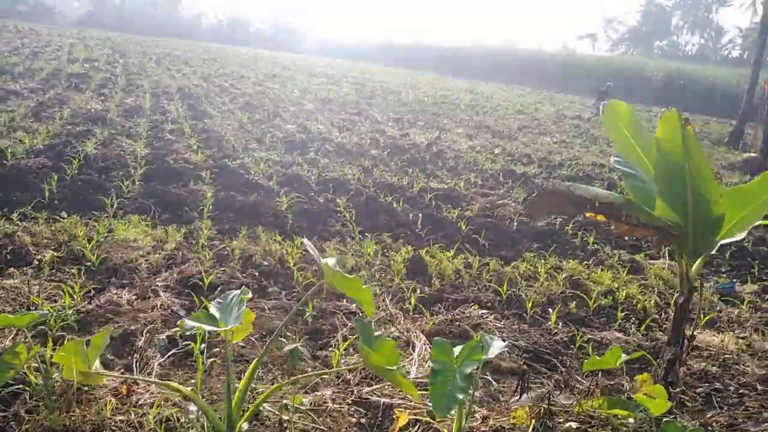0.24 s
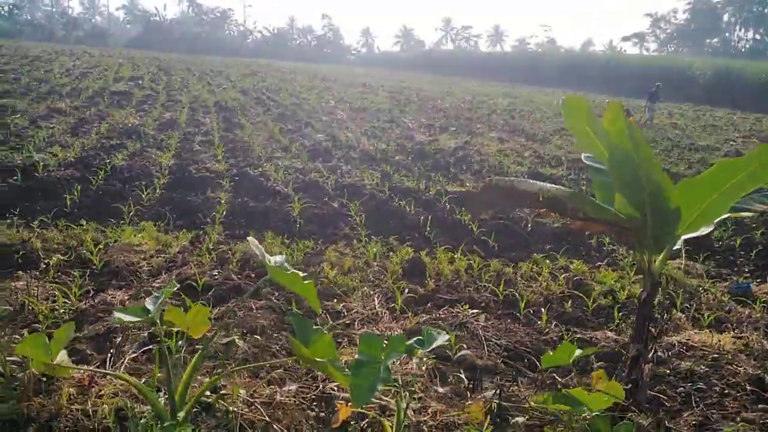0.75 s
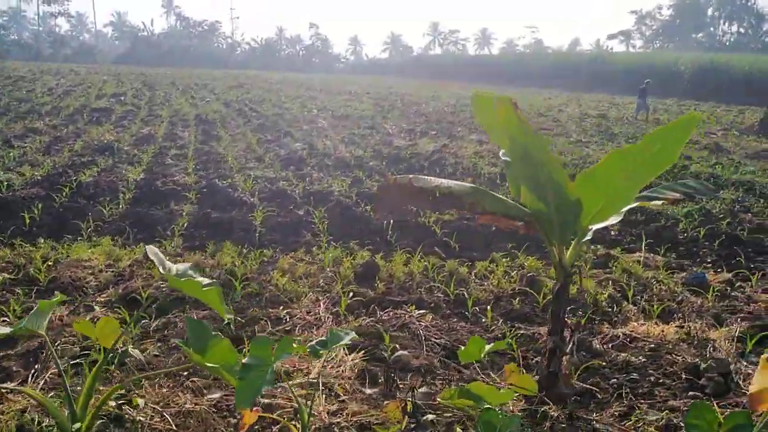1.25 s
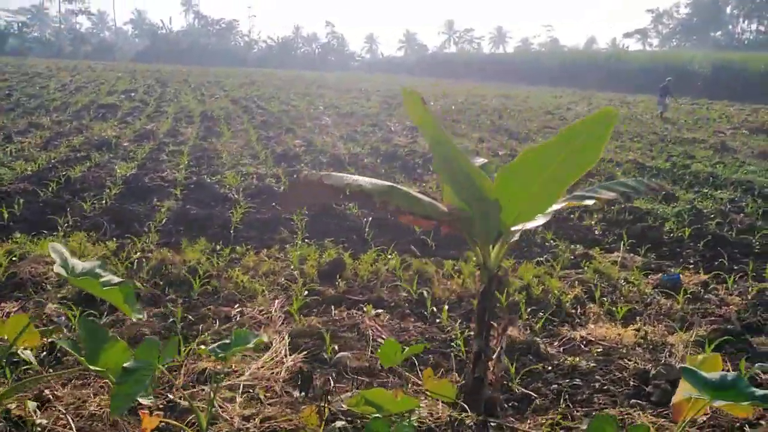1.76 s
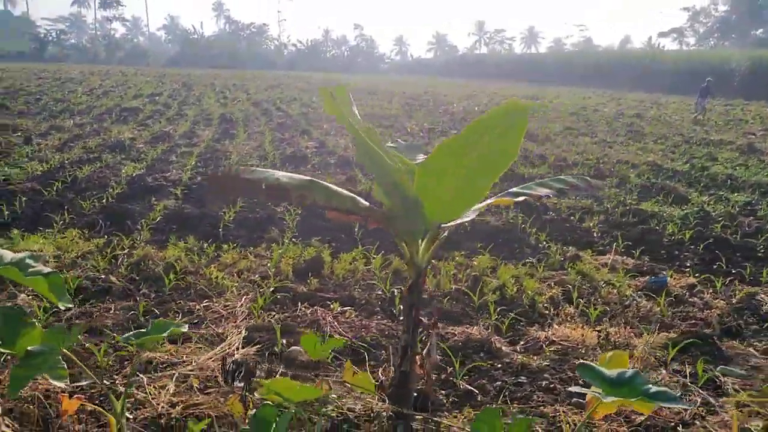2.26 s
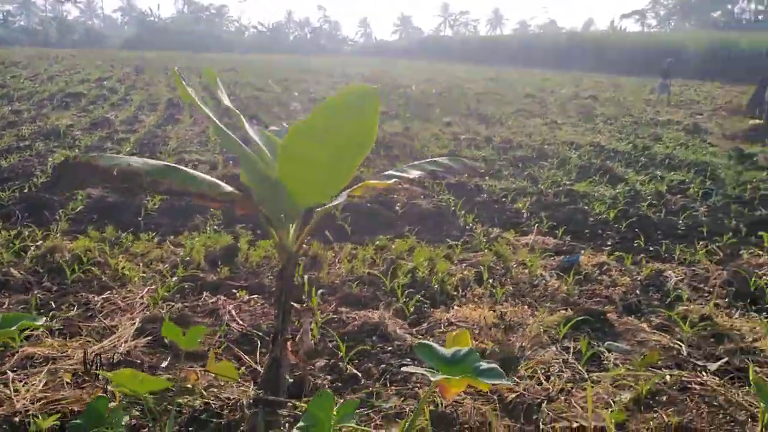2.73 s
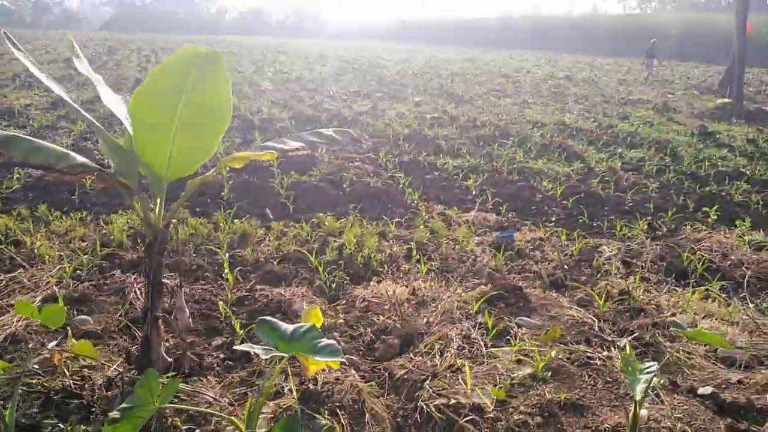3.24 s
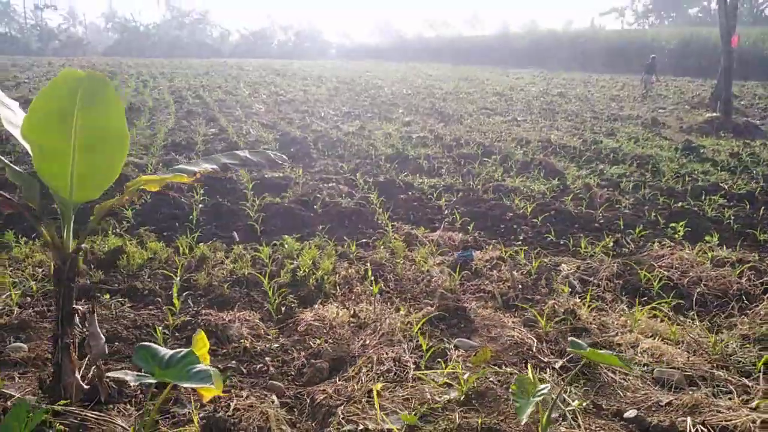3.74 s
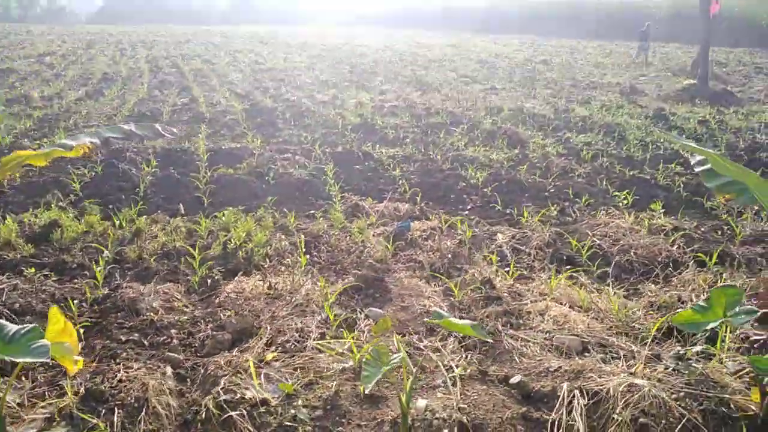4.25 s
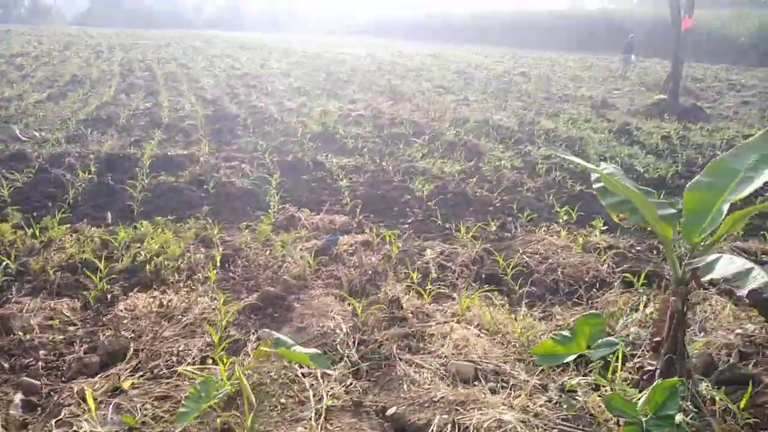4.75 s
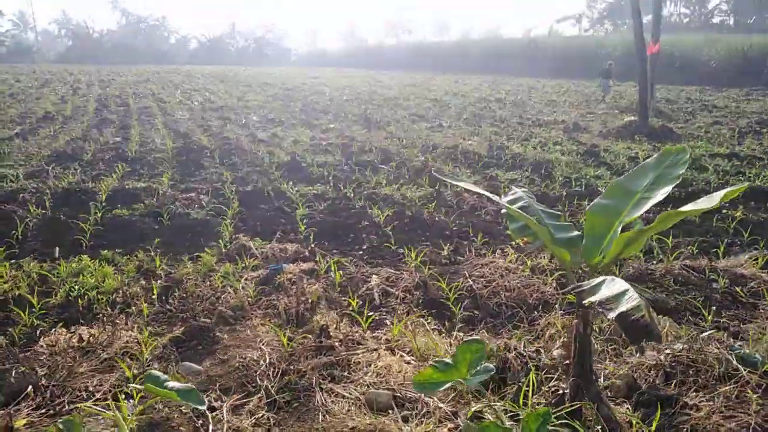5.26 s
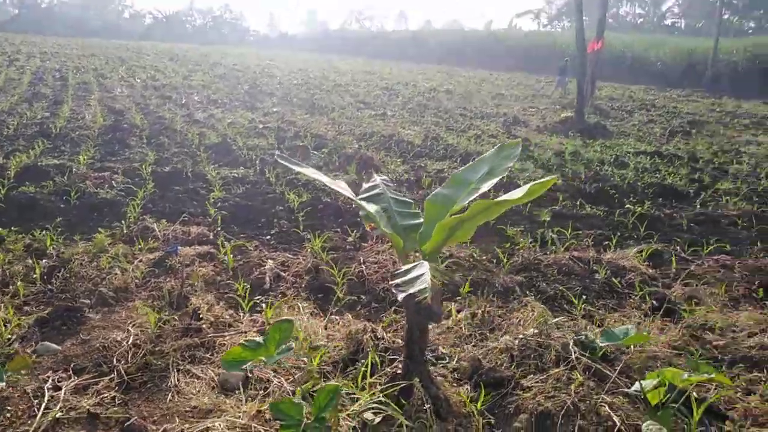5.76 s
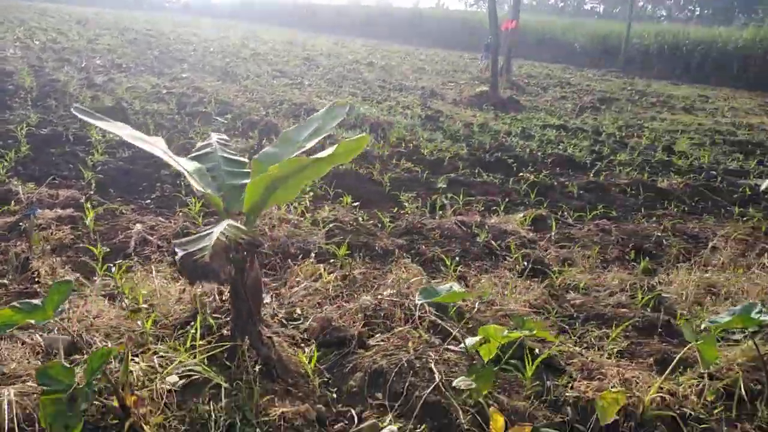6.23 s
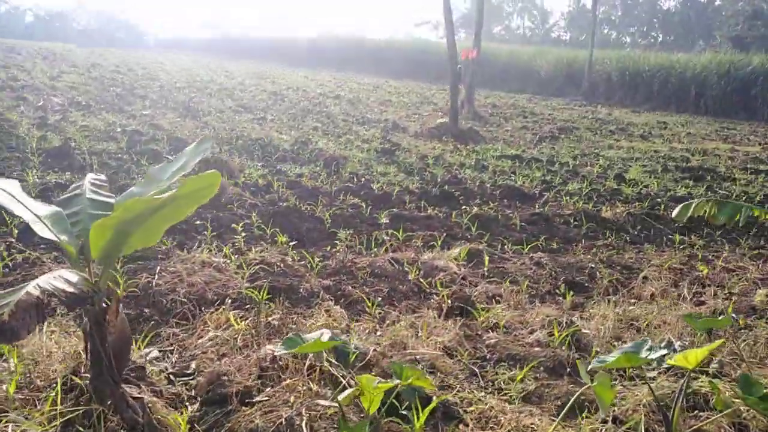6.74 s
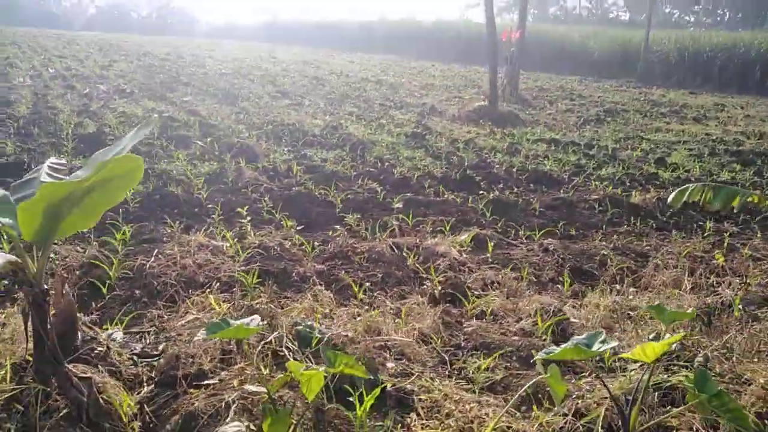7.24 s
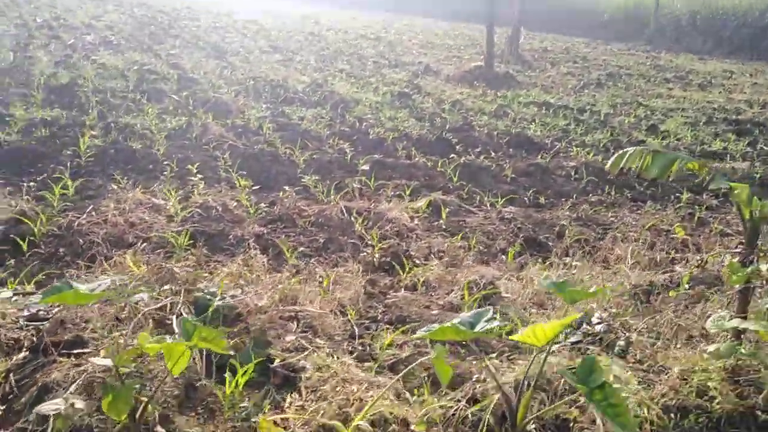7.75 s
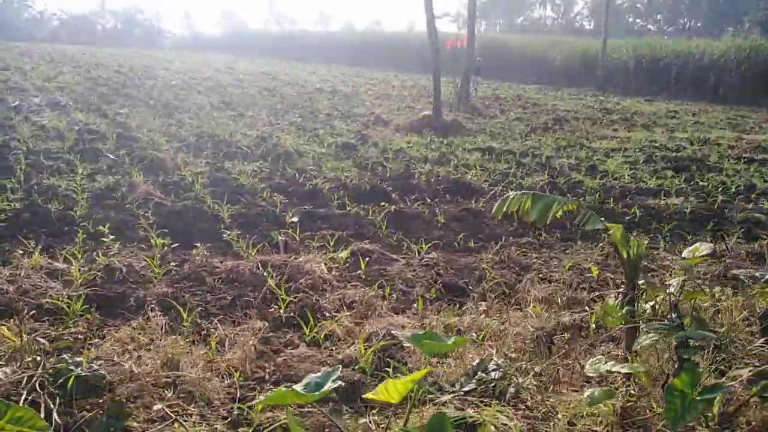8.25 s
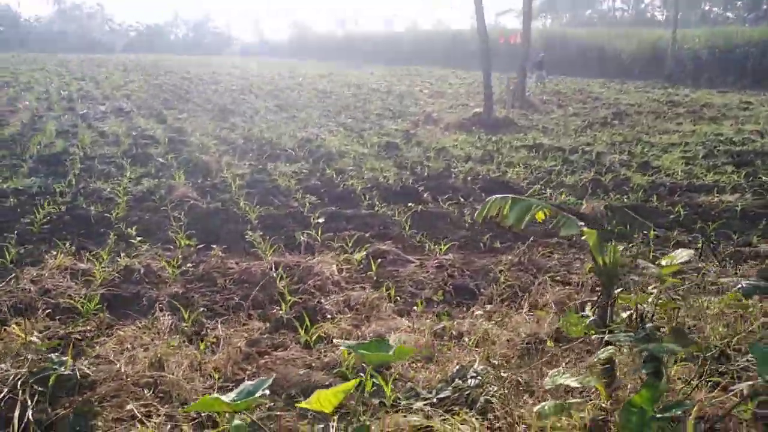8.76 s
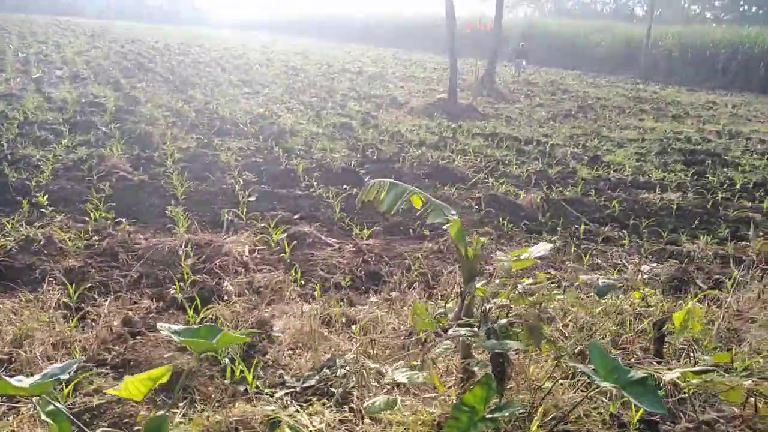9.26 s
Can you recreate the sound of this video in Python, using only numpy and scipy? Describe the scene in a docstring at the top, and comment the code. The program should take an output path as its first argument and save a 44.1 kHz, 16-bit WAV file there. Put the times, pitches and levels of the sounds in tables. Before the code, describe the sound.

Outdoors at the edge of a farm field, a dense, high cicada buzz runs throughout, nearer rasping singers swelling in, later mostly on the left. Someone walks slowly close to the stereo microphone, crunching straw and soil with small ticks and dry cracks. Birds chirp and trill, a far horn toots in the first half, roosters crow faintly and an engine thuds low in the distance.

```python
"""Slow steps over dry clods and straw at the edge of a field full of cicadas; small birds chirp and trill.
Far off an engine thuds, a motor whines, a horn toots twice and roosters crow.
Cicada bands, straw, cloth and air are shaped noise; near cicadas are pulsed, rasping tones.
Birds, roosters and horn are sliding or ringing tones with echo; steps add crumbs, ticks and cracks."""
import sys
import numpy as np
from scipy import signal
from scipy.fft import rfft, irfft, next_fast_len
from scipy.io import wavfile
from scipy.ndimage import uniform_filter1d, map_coordinates

SR = 44100
rng = np.random.default_rng(int(sys.argv[2]) if len(sys.argv) > 2 else 0)


def wav_record(signal):
    """Record a signal, one row per channel, as 16-bit PCM in the file named by sys.argv[1]."""
    frames = np.transpose(np.atleast_2d(signal))
    bounded = np.clip(frames, -1, 1)
    # unit amplitude maps onto the largest positive 16-bit level
    quanta = np.round(bounded * 32767).astype(np.int16)
    wavfile.write(sys.argv[1], SR, quanta)


N = 418950

# Spectrum of the open air. Each row: frequency in Hz, relative density in dB per Hz.
AIR_SPECTRUM = [(30, -9), (250, 2), (450, -6.5), (1000, -8), (2000, -16), (3500, -28), (6000, -31),
                (14000, -53)]
# Echo of the tree line. Each row: frequency in Hz, decay by 60 dB in seconds.
TREE_ECHO = [(200, 0.15), (1000, 0.24), (3000, 0.41), (9000, 0.012)]
# Engine loudness. Each row: time in seconds, level in dB.
ENGINE_LEVEL = [(0, -54.5), (3.8, -55), (8.2, -50), (9.5, -51.5)]
# Exhaust spectrum. Each row: frequency in Hz, relative density in dB per Hz.
EXHAUST_SPECTRUM = [(20, -29), (38, -30), (60, -10.5), (80, -0.5), (100, 4), (125, 3), (160, -7),
                    (220, -18.5), (320, -38.5), (600, -70.5)]
# Rooster syllables. Each row: start in seconds, length in seconds, start pitch in Hz, end pitch in Hz,
# relative level in dB, overtone against fundamental in dB.
CROWS = [(0, 0.15, 712, 704, -61.5, -1), (0.129, 0.26, 687, 652, -68.5, -21),
         (2.568, 0.12, 1023, 989, -75, 6), (5.127, 0.31, 940, 1153, -68, -16),
         (6.516, 0.28, 1140, 1098, -76.5, -14), (6.946, 0.5, 1192, 980, -73.5, -40),
         (8.387, 0.55, 959, 898, -84, 8), (8.748, 0.26, 1108, 1146, -75, -20)]
# Toots of a far vehicle horn. Each row: start in seconds, length in seconds, pitch in Hz,
# relative level in dB, disc resonance in Hz.
TOOTS = [(2.425, 0.15, 417.5, -50.5, 3450), (3.505, 0.062, 419, -55, 2850),
         (3.561, 0.05, 419.5, -35.5, 2965)]
# Slurred whistles of the nearer birds. Each row: start in seconds, length in seconds, start pitch in Hz,
# end pitch in Hz, relative level in dB.
CHIRPS = [(0.283, 0.1, 2450, 2750, -65), (1.816, 0.09, 3580, 6480, -53.5),
          (2.041, 0.027, 1090, 2830, -55.5), (2.904, 0.025, 2230, 2430, -58),
          (3.121, 0.048, 2110, 2635, -53), (3.319, 0.075, 2290, 2660, -60),
          (3.701, 0.037, 2480, 2790, -55.5), (3.957, 0.043, 2570, 2770, -58),
          (5.998, 0.12, 5600, 5060, -51), (6.377, 0.3, 3780, 3500, -74.5), (6.5, 0.064, 1550, 1760, -67.5),
          (7.116, 0.023, 2410, 2620, -62.5), (7.189, 0.02, 4520, 7470, -44.5),
          (7.29, 0.063, 2430, 2900, -64.5), (7.495, 0.033, 2450, 2594, -57),
          (8.154, 0.011, 1420, 2900, -49), (8.161, 0.091, 3680, 5900, -62), (8.247, 0.047, 5720, 7200, -46),
          (8.9, 0.058, 3500, 6450, -63)]
# Phrases of evenly spaced trills. Each row: start in seconds, number of trills, mean level of the last in dB.
TRILL_PHRASES = [(6.45, 4, -52.5), (7.617, 4, -44), (8.966, 3, -42.5)]
# Lower cicada band. Each row: frequency in Hz, relative density in dB per Hz.
CHORUS_SPECTRUM = [(3500, -37.5), (4500, -40), (5000, -3), (5500, -3), (6200, 1), (6600, 5.5), (6920, 10),
                   (7200, 4.5), (7500, -0.5), (7950, -19), (10000, -78)]
# Upper cicada band. Each row: frequency in Hz, relative density in dB per Hz.
HIGH_CHORUS_SPECTRUM = [(7000, -45.5), (7900, -2), (8500, 4.5), (9100, 12), (9700, 11), (10000, 5.5),
                        (10350, 1.5), (10700, -25), (11400, -58)]
# Swell of the upper band. Each row: time in seconds, level in dB.
HIGH_SWELL = [(0, -50), (2.7, -50.5), (3.6, -48.5), (5.8, -48.5), (6.7, -49.5), (9.5, -49)]
# Song bouts of near cicadas. Each row: start in seconds, end in seconds, tymbal pulses per second,
# pitch in Hz, level in dB, left over right in dB.
BOUTS = [(-1.0, 1.9, 100, 9760, -54.5, 1.2), (2.6, 6.3, 101.2, 9700, -54, 1.2),
         (7.3, 8.8, 109.5, 9250, -45, 9), (8.4, 9.9, 109, 9270, -47, 9), (6.9, 9.4, 107, 8400, -52.5, 7)]
# Cloth spectrum. Each row: frequency in Hz, relative density in dB per Hz.
CLOTH_SPECTRUM = [(180, 0), (300, -4), (390, 1), (480, -20), (900, -73)]
# A sole pressing on straw and soil. Each row: start in seconds, fade time in seconds, relative level in dB.
STEPS = [(0, 0.16, -53.5), (0.639, 0.21, -51.5), (1.457, 0.28, -62), (2.169, 0.37, -58.5),
         (2.975, 0.25, -55.5), (3.762, 0.26, -59), (4.563, 0.16, -56.5), (5.363, 0.22, -53.5),
         (6.098, 0.22, -59.5), (6.873, 0.15, -55), (7.624, 0.24, -62), (8.356, 0.18, -59),
         (8.999, 0.18, -61), (9.189, 0.22, -55.5)]
# Rustle underfoot. Each row: frequency in Hz, relative density in dB per Hz.
RUSTLE_SPECTRUM = [(100, -14), (300, 1), (550, -21.5), (800, -9.5), (1400, -0.5), (2200, 6), (3100, 1),
                   (4500, 0.5), (8000, -27.5), (14000, -58)]
# Clods breaking underfoot. Each row: time in seconds, level in dB, pitch in Hz,
# fall-off to either side in dB per octave, crumbling time in seconds.
CLODS = [(0.061, -48, 1710, 15, 0.0011), (.123, -48.5, 1310, 16, 0.0048), (.669, -48, 1143, 11, 0.012),
         (.682, -47, 1180, 16, 0.00076), (0.7395, -43.5, 970, 13, 0.00024),
         (0.7478, -38.5, 1130, 18.5, 0.001), (0.7524, -43.5, 1140, 20, 0.00039),
         (0.862, -49.5, 1450, 41, 0.0015), (1.502, -49, 905, 32, 0.025), (1.531, -48.5, 1130, 25, 0.014),
         (1.654, -51, 650, 9, 0.0033), (1.758, -55.5, 1200, 21, 0.0032), (2.226, -55.5, 890, 22, 0.011),
         (2.276, -41, 600, -1, 0.0072), (2.283, -39, 1010, 4.5, 0.0027), (2.455, -42, 1120, 0.5, 0.011),
         (3.018, -47.5, 730, 31, 0.0024), (3.087, -49.5, 1150, 11, 0.0013), (3.859, -51, 1060, 27, 0.0073),
         (4.035, -43, 1270, 12, 0.0017), (4.628, -54, 1180, 23, .012), (5.401, -38, 1520, 18, 0.005),
         (5.457, -39, 1220, 6, 0.005), (5.632, -58, 855, 5.5, 0.0045), (6.188, -51.5, 1310, 7, 0.006),
         (6.322, -48, 274, 6.5, 0.0034), (6.888, -53, 870, 19, 0.0054), (7.684, -50.5, 870, 17, 0.014),
         (8.395, -50.5, 1100, 7, 0.0074), (8.423, -59, 1520, 10, 0.0042), (8.63, -55, 960, 10.5, 0.012),
         (9.028, -51.5, 1530, 20, 0.009), (9.2235, -41.5, 890, 10.5, 0.0031), (9.235, -46, 856, 5, 0.0038)]
# Dry stalks cracking. Each row: time in seconds, level in dB, splintering time in seconds.
STALKS = [(.665, -39, 0.0056), (2.208, -47.5, 0.03), (2.2824, -40, 0.011), (4.1246, -36, 0.0014),
          (5.394, -34.5, 0.011), (6.131, -37.5, 0.018)]
# Crack spectrum of a stalk. Each row: frequency in Hz, relative gain in dB.
STALK_SPECTRUM = [(300, -48), (800, -12), (1600, 0.5), (3300, -2.5), (6500, -2.5), (9000, -2),
                  (11000, -0.5), (14000, -32)]

TOP_HZ = 13900
WHINE_HZ, WHINE_DB = 662, -71.5
WHINE_START_S, WHINE_STOP_S, WHINE_RISE_S, WHINE_FALL_S = 0.51, 3.3, 0.96, 0.35
TRILL_GAP_S, TRILL_GROWS_DB = 0.1675, 1.5
CHORUS_DB = -46.5
SURGE_S, SURGE_PEAK_S, SURGE_DB = 0.956, 5.35, 0.5  # lower band: period, time of one crest, depth
BOUT_SWELL_S, BOUT_FADE_S = 1, 0.22
RUB_S, RUB_END_S, RUB_RISE_S, RUB_FALL_S, RUB_DB = 2.883, 3.444, 0.2, 0.14, -60.5
LEAD_S = 0.012  # a short noise ramp this long leads into each tick


def amp(db):
    """Decibels to gain."""
    return 10 ** (np.asarray(db) / 20)


def unit(x):
    """Scale to rms 1."""
    return x / np.sqrt(np.mean(x ** 2) + 1e-20)


def along(points, hz):
    """Interpolate (Hz, value) points on a log frequency axis."""
    f, v = np.transpose(points)
    return np.interp(np.log(hz + 1), np.log(f + 1), v)


def curves(rows):
    """One value per sample for each column after the time."""
    s, *cols = np.transpose(rows)
    return [np.interp(np.arange(N) / SR, s, c) for c in cols]


def wobble(rate_hz, size=8):
    """A smooth random curve with rate_hz knots a second."""
    knots = rng.standard_normal(int(N * rate_hz / SR) + 4)
    at = np.arange(size * len(knots)) / size
    return np.interp(np.arange(N) * rate_hz / SR, at, map_coordinates(knots, [at]))


def swell(start_s, end_s, attack_s, release_s):
    """Attack, hold and release between two times."""
    t = np.arange(N) / SR
    return np.clip(np.minimum((t - start_s) / attack_s, (end_s - t) / release_s), 0, 1)


def filtered(x, response):
    """Multiply the spectrum of x by a response of frequency."""
    m = next_fast_len(N + SR // 2)
    return irfft(rfft(x, m) * response(np.fft.rfftfreq(m, 1 / SR)), m)[..., :N]


def coloured(x, spectrum):
    """x through a spectrum, at rms 1."""
    return unit(filtered(x, lambda hz: amp(along(spectrum, hz))))


def stereo_noise(spectrum):
    """Two independent channels of shaped noise."""
    return coloured(rng.standard_normal((2, N)), spectrum)


def patchy(x, depth_db, size=3):
    """x at rms 1 with random gain patches in frequency and time, larger with size."""
    z = signal.stft(x, nperseg=512)[2]
    field = uniform_filter1d(rng.standard_normal(z.shape[1:]), size, 0)
    field = uniform_filter1d(field, 4 * size, 1)
    return unit(signal.istft(z * amp(depth_db * unit(field)), nperseg=512)[1][:, :N])


def causal(gain_db, size=2048):
    """A unit-energy minimum-phase impulse response with the given dB gain of frequency."""
    cep = irfft(np.log(amp(gain_db(np.fft.rfftfreq(size, 1 / SR)))))
    cep[1:size // 2] *= 2  # fold the cepstrum to positive time
    cep[size // 2 + 1:] = 0
    h = irfft(np.exp(rfft(cep)))
    return h / np.linalg.norm(h)


def add(track, s, sound):
    """Mix a sound in at time s."""
    start = max(0, round(s * SR))
    part = track[..., start:start + sound.shape[-1]]
    part += sound[..., :part.shape[-1]]


def pan(lean_db):
    """Left and right gains for a left-over-right level difference."""
    return amp(np.array([[0.5], [-0.5]]) * lean_db)


def ports(pair, spread):
    """Two microphone signals from a common part and a differing part."""
    return np.array([pair[0] + spread * pair[1], pair[0] - spread * pair[1]])


def lagged(pair, lag_ms):
    """Sound from the left reaches the left microphone first."""
    side = np.array([[1], [-1]])
    return filtered(pair, lambda hz: np.exp(1j * np.pi * hz * lag_ms / 1000 * side))


def glide(length_s, start_hz, end_hz, bend=1):
    """Phase and arched envelope of a sliding note; with a bend under 1 it slides fast first, then levels off."""
    u = np.linspace(0, 1, max(8, int(length_s * SR)))
    hz = start_hz * (end_hz / start_hz) ** (u ** bend)
    return 2 * np.pi * np.cumsum(hz) / SR, np.sqrt(np.abs(np.sin(np.pi * u)))


def waver(depth_hz, rate_hz, length):
    """Phase of a random frequency deviation, length samples long."""
    return 2 * np.pi * np.cumsum(depth_hz * wobble(rate_hz)[:length]) / SR


def echo(x, late_db=-20, late_t60_s=0.46):
    """The scattered answer of the trees, with a faint longer roll from the land beyond."""
    hz, t, z = signal.stft(rng.standard_normal((2, 3 * SR)), SR, nperseg=256)
    trees = amp(-60 * t / along(TREE_ECHO, hz)[:, None])
    land = amp(late_db - 60 * t / late_t60_s)
    tail = signal.istft(z * (trees + land), SR, nperseg=256)[1]
    answer = signal.fftconvolve(x[None], tail / np.linalg.norm(tail[0]), axes=1)[:, :N]
    # moving air makes it flutter
    return (0.85 + 0.25 * np.tanh(wobble(40))) * answer


def distant(x, wet_db):
    """A far sound with its echo."""
    return x + amp(wet_db) * echo(x)


def open_air():
    """Faint, patchy, slowly wavering noise, almost unrelated between the sides."""
    hush = ports(patchy(stereo_noise(AIR_SPECTRUM), depth_db=7.0), spread=0.99)
    return amp(-81.0 + 0.52 * wobble(2.6)) * hush


def engine(firing_hz=19.7, blur=1.7):
    """Slow exhaust beats, blurred by distance into a low rumble."""
    db, = curves(ENGINE_LEVEL)
    cycles = np.cumsum(firing_hz * (1 + 0.0093 * wobble(3.3))) / SR
    beats = np.diff(np.floor(cycles), prepend=0)
    thud = coloured(beats - beats.mean(), EXHAUST_SPECTRUM)
    rumble = ports(stereo_noise(EXHAUST_SPECTRUM), spread=0.26)
    return amp(db + 0.72 * wobble(11)) * unit(thud + blur * rumble) * pan(1.5)


def whine():
    """A far motor comes up, holds one wavering note, then dies away."""
    running = swell(WHINE_START_S, WHINE_STOP_S, WHINE_RISE_S, WHINE_FALL_S)
    phase = 2 * np.pi * np.cumsum(WHINE_HZ * (1 + 0.009 * wobble(45))) / SR
    side_drift = 0.5 * np.array([wobble(20), wobble(20)])
    return running * amp(WHINE_DB + 2.5 * wobble(9)) * np.sin(phase + side_drift)


def roosters(hoarse=0.04):
    """Far crows: hoarse, ragged sliding notes with a strong echo."""
    out = np.zeros(N)
    for s, length_s, start_hz, end_hz, db, overtone_db in CROWS:
        phase, arch = glide(length_s, start_hz, end_hz)
        phase = phase + waver(hoarse * start_hz, 144.6, len(phase))
        voice = np.sin(phase) + amp(overtone_db) * np.sin(2 * phase)
        add(out, s, amp(db) * arch * voice)
    ragged = amp(5 * np.tanh(wobble(60)) - 2)
    return distant(out * ragged, wet_db=-1)


def horn(width_hz=370, base_db=-58, octave_db=-2, octave_t60_s=0.13):
    """A buzzing diaphragm drives a disc that rings near 3 kHz, and briefly at its octave as each toot starts."""
    out = np.zeros(N)
    k = np.arange(1, 17)
    for s, length_s, pitch_hz, db, ring_hz in TOOTS:
        phase, arch = glide(length_s, pitch_hz, pitch_hz)
        phase = phase + waver(0.006 * pitch_hz, 600, len(phase))
        partials = np.sin(k[:, None] * phase)

        def ring(centre_hz):
            return (1 / (1 + ((k * pitch_hz - centre_hz) / width_hz) ** 2) ** 2) @ partials

        onset = amp(octave_db - 60 * np.arange(len(phase)) / SR / octave_t60_s)
        disc = amp(db + 5.5) * (ring(ring_hz) + onset * ring(2 * ring_hz))
        base = amp(base_db) * length_s / 0.071 * partials[0]  # longer toots get more fundamental
        add(out, s, arch ** 2 * (disc + base))
    direct = lagged(out * pan(10), lag_ms=0.19)
    roll = echo(out, late_db=-16, late_t60_s=4.4)
    # moving air breaks up the long roll
    flutter = 1 + 0.4 * wobble(70) + 0.25 * wobble(300)
    roll = np.std(roll) * patchy(roll * flutter, depth_db=3.5)
    return direct + amp(-9.0) * roll


def chatter(count=70, level_db=-80, range_db=5, centre_hz=2300, scatter=0.33):
    """Many farther birds drop faint short notes at random."""
    out = np.zeros(N)
    for when, pitch, slide, size in rng.random((count, 4)):
        hz = centre_hz * np.exp(scatter * (2 * pitch - 1))
        phase, arch = glide(0.035, hz, hz * np.exp(0.8 * (slide - 0.5)))
        drift = np.cumsum(rng.normal(0, 0.088, len(phase)))
        add(out, when * N / SR, amp(level_db + range_db * size) * arch ** 2 * np.sin(phase + drift))
    return distant(out, wet_db=2.0)


def birds(note_gap_s=0.0103, count=6):
    """Single slurred, fluttering whistles, and growing runs of trills made of very quick falling notes."""
    out = np.zeros(N)
    for s, length_s, start_hz, end_hz, db in CHIRPS:
        phase, arch = glide(length_s, start_hz, end_hz, bend=0.75)
        add(out, s, amp(db) * arch * np.sin(phase + waver(75, 300, len(phase))))
    out *= amp(2 * wobble(150) - 1)  # flutter, whistles only
    for start_s, trills, db in TRILL_PHRASES:
        for i in range(round(trills)):
            level_db = db - TRILL_GROWS_DB * (trills - 1 - i)
            for k in range(count):
                phase, arch = glide(0.0099, start_hz=5950 + rng.normal(0, 54), end_hz=5125)
                note = amp(level_db + rng.normal(0, 2.3)) * arch ** 2 * np.sin(phase)
                add(out, start_s + i * TRILL_GAP_S + k * note_gap_s, note)
    return distant(out, wet_db=-7)


def cicada(rate_hz, centre_hz, sweep_hz, rasp_hz):
    """Each tymbal buckle is a short rasping burst whose pitch falls."""
    cycle = np.cumsum(rate_hz * (1 + 0.0053 * wobble(14))) / SR % 1
    burst = np.exp(2 * np.cos(2 * np.pi * (cycle - 0.5)))
    hz = centre_hz - sweep_hz * (cycle - 0.5) + rasp_hz * wobble(700)
    phase = 2 * np.pi * np.cumsum(hz) / SR
    side_drift = np.array([0 * phase, 2 * wobble(60)])
    return unit(amp(0.5 * wobble(40)) * burst * np.sin(phase + side_drift))


def swarm(spectrum):
    """Countless far cicadas merge into a band of patchy noise."""
    return patchy(stereo_noise(spectrum), depth_db=0.8, size=10)


def insects():
    """Two far bands, the lower surging in step; near cicadas swell out of the upper band in bouts."""
    high_db, = curves(HIGH_SWELL)
    surge_db = SURGE_DB * np.cos(2 * np.pi * (np.arange(N) / SR - SURGE_PEAK_S) / SURGE_S)
    out = amp(CHORUS_DB + surge_db) * swarm(CHORUS_SPECTRUM) * pan(-0.59)
    out += amp(high_db) * swarm(HIGH_CHORUS_SPECTRUM) * pan(6.5)
    for start_s, end_s, rate_hz, hz, db, lean_db in BOUTS:
        song = cicada(rate_hz, hz, sweep_hz=1100, rasp_hz=90)
        out += amp(db) * swell(start_s, end_s, BOUT_SWELL_S, BOUT_FADE_S) * song * pan(lean_db)
    return out


def rub():
    """A dull rub of clothing, close by: low noise that swells and fades."""
    brush = swell(RUB_S, RUB_END_S, RUB_RISE_S, RUB_FALL_S)
    cloth = ports(stereo_noise(CLOTH_SPECTRUM), spread=0.3)
    return brush * amp(RUB_DB + 0.86 * wobble(40)) * cloth


def crumbs(pitch_hz=1280, scatter=0.31, cycles=2.05, count=3600, size=300):
    """Bits of dry soil breaking, each with a tiny ring at its own pitch."""
    t = np.arange(size) / SR
    pitch, strength = np.clip(rng.standard_normal((2, count, 1)), -2, 2)
    turns = pitch_hz * np.exp(scatter * pitch) * t
    rings = amp(3.3 * strength) * np.sin(2 * np.pi * turns) * np.exp(-turns / cycles)
    at = rng.integers(N, size=(count, 1)) + np.arange(size)
    return unit(np.bincount(at.ravel(), rings.ravel(), N)[:N])


def steps(rise_s=0.024, fade_db=12, rustle_db=-6, crumb_db=-2.5):
    """Each sole eases onto rustling straw and crushes soil in clumps; both thin out as the foot settles."""
    t, press = np.arange(SR) / SR, np.zeros(N)
    for s, length_s, db in STEPS:
        add(press, s, amp(db - fade_db * (t / length_s) ** 2) * np.minimum(t / rise_s, 1) ** 2)
    straw = ports(patchy(stereo_noise(RUSTLE_SPECTRUM), depth_db=6), spread=0.8)
    clumps = amp(6 * np.tanh(wobble(55)))
    soil = patchy(ports([crumbs(), crumbs()], spread=0.5), depth_db=4)
    ground = press * (amp(rustle_db) * np.sqrt(clumps) * straw + amp(crumb_db) * clumps * soil)
    return lagged(ground * pan(0.53), lag_ms=0.08)


def fracture(spread_s, gain_db, crumb_db=-28, crumb_t60_s=0.16):
    """A short ramp of noise, one clean tick that breaks into bits over spread_s, then a trickle of crumbs."""
    lead = round(LEAD_S * SR)
    t = np.arange(-lead, SR // 10) / SR
    bits = np.clip(rng.standard_normal((2, len(t))), -2, 2) ** 3
    ramp = np.minimum(1 + t / LEAD_S, 1) ** 2
    trickle = amp(crumb_db - 60 * t / crumb_t60_s)
    force = 0.06 * bits * ramp * (np.exp(-np.abs(t) / spread_s) + trickle)
    force[0, lead] += 1
    tick = signal.fftconvolve(ports(force, spread=0.31), causal(gain_db)[None], axes=1)
    return tick / np.linalg.norm(tick.mean(0)) * np.sqrt(SR / 100)  # energy of rms 1 over 10 ms


def snaps(knee_octaves=0.39):
    """Each clod breaks with a dull tick at its own pitch; dry stalks crack across the whole treble."""
    out = np.zeros((2, N))
    for s, db, pitch_hz, slope_db, spread_s in CLODS:
        def body(hz):
            octaves = np.hypot(np.log2((hz + 1) / pitch_hz), knee_octaves)
            return np.maximum(-slope_db * octaves - (hz / 5000) ** 2, -90)

        add(out, s - LEAD_S, amp(db) * fracture(spread_s, body))
    for s, db, spread_s in STALKS:
        add(out, s - LEAD_S, amp(db) * fracture(spread_s, lambda hz: along(STALK_SPECTRUM, hz)))
    return lagged(out * pan(0.76), lag_ms=0.14)


def walker():
    """Footsteps with a weak echo, and the rub of clothing."""
    feet = steps() + snaps()
    return feet + amp(-10) * echo(feet.mean(0)) + rub()


def scene():
    """All sources over the faint hush of open air."""
    far = open_air() + engine() + whine() + roosters() + horn()
    return far + chatter() + birds() + insects() + walker()


def record(dry):
    """Band limit: nothing passes from TOP_HZ up."""
    return filtered(dry, lambda hz: hz < TOP_HZ)


dry = scene()
out = record(dry)
wav_record(out)
```